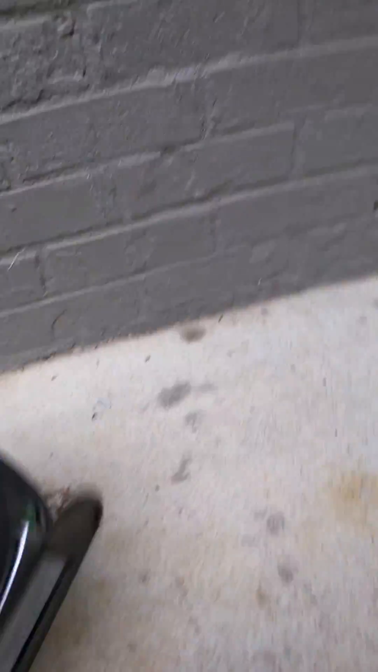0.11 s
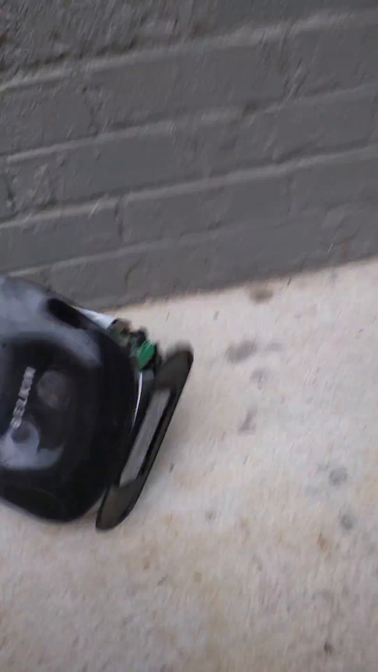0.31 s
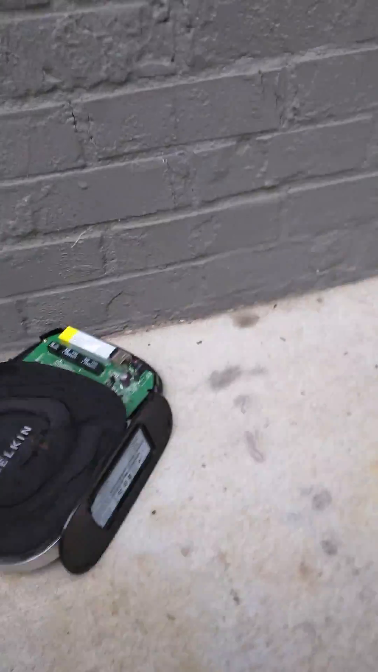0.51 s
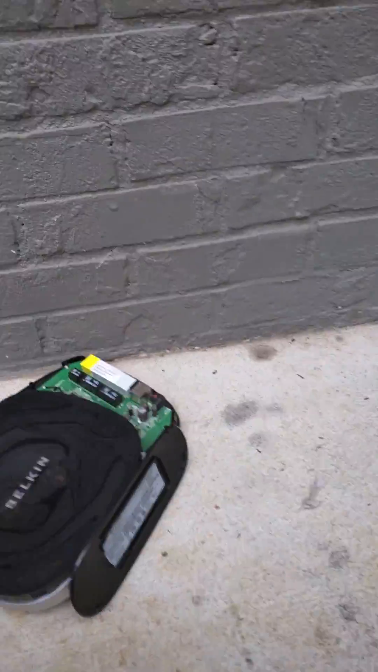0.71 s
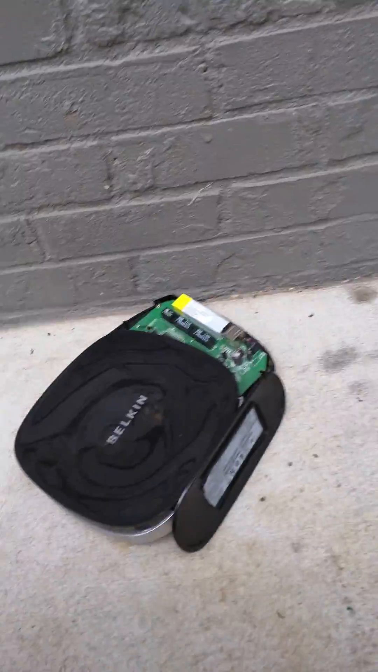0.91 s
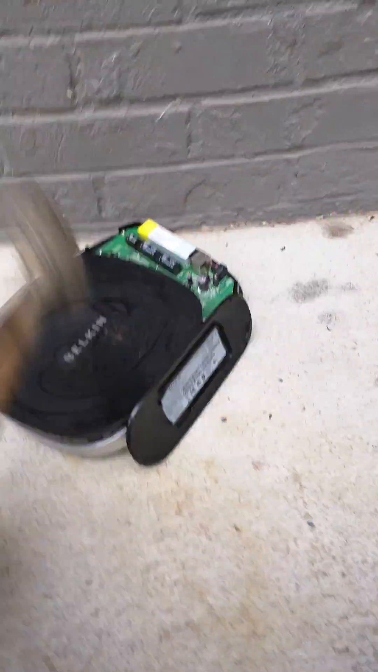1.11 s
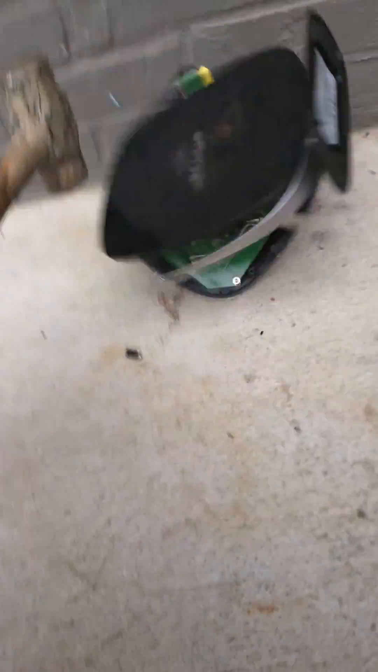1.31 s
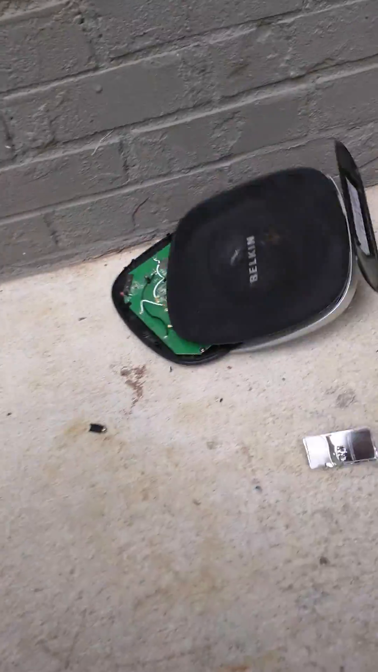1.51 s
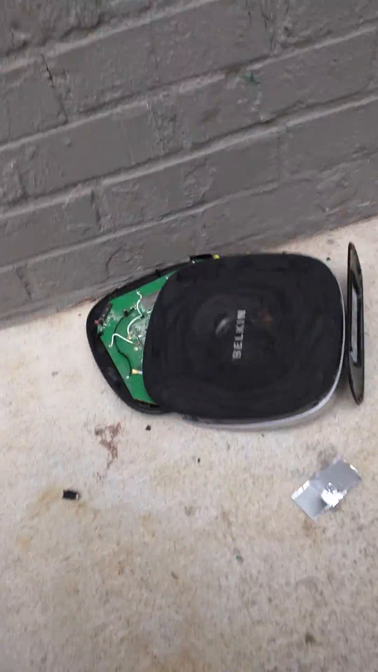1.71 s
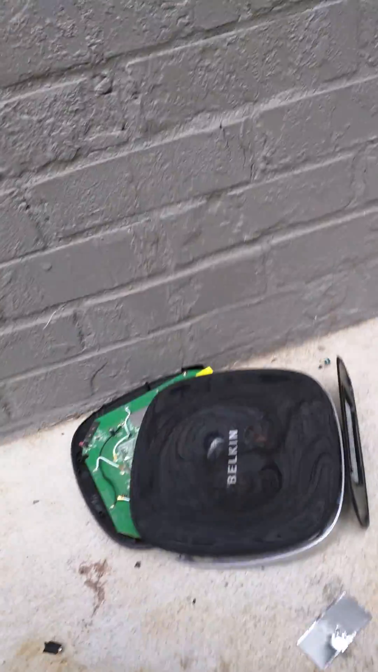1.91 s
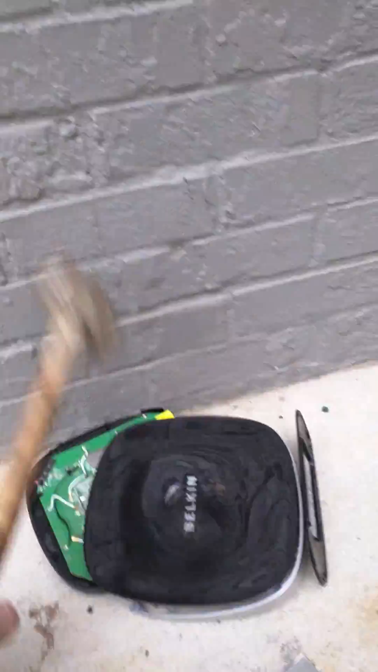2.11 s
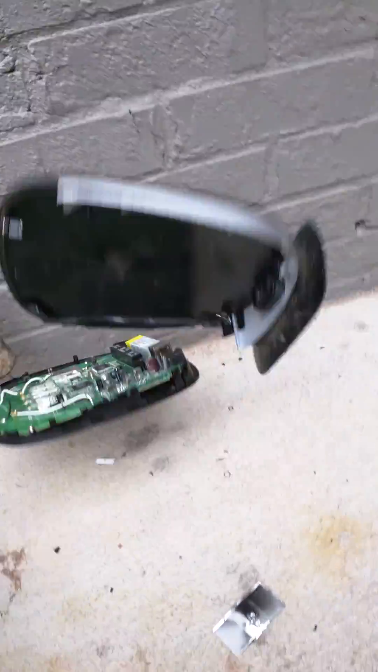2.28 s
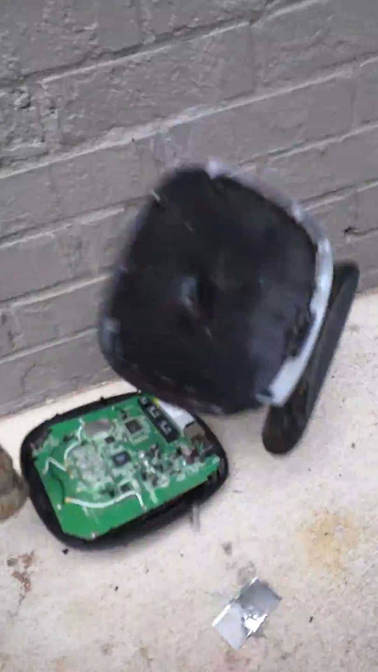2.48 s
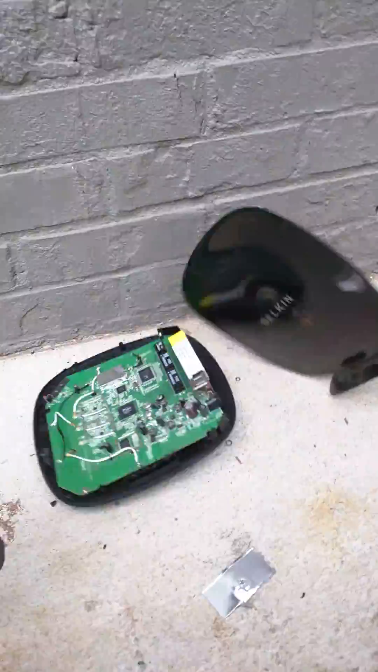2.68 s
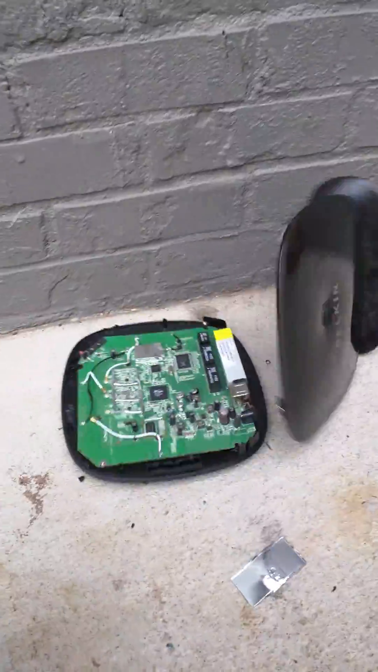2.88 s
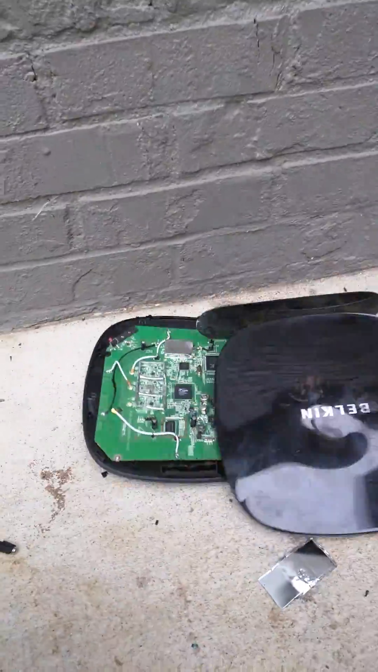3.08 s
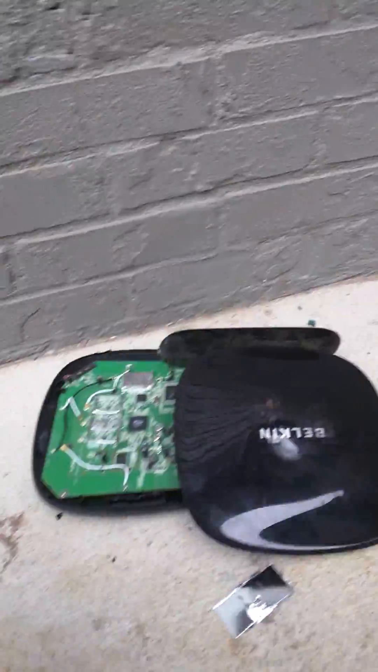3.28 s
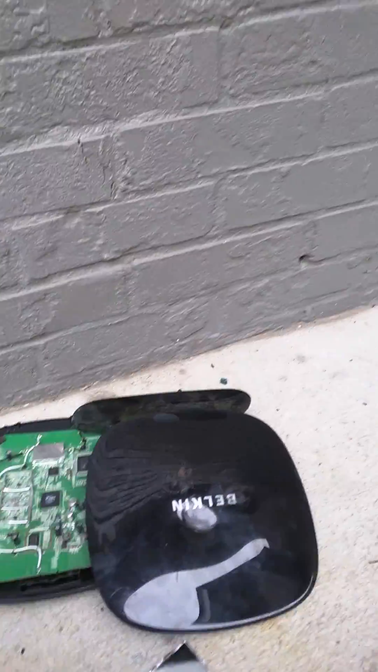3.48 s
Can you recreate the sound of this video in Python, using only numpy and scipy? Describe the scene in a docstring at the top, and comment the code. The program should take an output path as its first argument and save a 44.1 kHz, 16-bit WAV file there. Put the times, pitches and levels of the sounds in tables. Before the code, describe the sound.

Three hard, crunching hits break a hollow plastic case outdoors, with rattling bounces and metal tinkles

```python
"""Three heavy blows smash a plastic electronic device on concrete beside a brick wall: bursts of shaped noise.
After the first two the hollow case tumbles and clatters; the third knocks the lid off, which bounces and settles.
Each knock is noise ringing a resonant shell, plus a pitched panel and a click; chips and metal are fading sines.
Noise tails make the yard answer, rumble and hiss lie underneath, and the close microphone overloads.
"""
import sys
import numpy as np
from scipy import signal
from scipy.fft import rfft, irfft, next_fast_len
from scipy.io import wavfile
from scipy.ndimage import uniform_filter1d

SR = 44100
rng = np.random.default_rng(int(sys.argv[2]) if len(sys.argv) > 2 else 0)


def wav_record(signal):
    """Record a signal, one row per channel, as 16-bit PCM in the file named by sys.argv[1]."""
    frames = np.transpose(np.atleast_2d(signal))
    bounded = np.clip(frames, -1, 1)
    # unit amplitude maps onto the largest positive 16-bit level
    quanta = np.round(bounded * 32767).astype(np.int16)
    wavfile.write(sys.argv[1], SR, quanta)


N = 160965
T = np.arange(SR * 3 // 4) / SR  # time within one event, s

# In every table t60_s is the time to fall by 60 dB.
# Outdoor rumble and hiss, relative colours: pitch_hz, level_db
RUMBLE_COLOUR = [(15, -5), (25, -4.5), (64, -8), (120, -6.5), (170, -27), (284, -15.5), (486, -32),
                 (1300, -20), (3000, -81)]
HISS_COLOUR = [(200, -23), (600, 2.5), (1400, -4), (2700, -0.5), (15800, -1.5)]
RUMBLE_DB = -47.5
# Loudness of the faint hiss over time: time_s, level_db
HISS_LEVEL = [(0, -54), (.2, -43.5), (1.151, -51), (2.101, -57), (2.26, -56.5), (3.65, -51.5)]

# Slow subsonic swings of the recorder's zero line after each blow: peak_s, level_db, rise_s, settle_s
# (settle_s is the time to fall to about a third)
ZERO_LINE_SWINGS = [(.405, -19.5, 0.1, 0.064), (1.485, -18.5, 0.14, 0.05), (2.49, -30, 0.16, 0.038)]

# Low thuds: start_s, level_db, t60_s
THUDS = [(0.122, -38, 1), (0.209, -25, 0.16), (0.4, -28.5, 0.2), (1.29, -19.5, 0.054), (1.439, -40.5, 0.56),
         (2.292, -22.5, 0.1), (2.469, -38, 0.43), (2.72, -39, 0.73), (3.232, -33, 0.71), (3.309, -38, 0.71)]
# Relative colour of the thuds: pitch_hz, level_db
THUD_COLOUR = [(20, 1.5), (70, -4), (140, -10), (260, -18), (800, -60)]

# How fast the yard's answer dies: pitch_hz, t60_s
YARD_FALL = [(200, 0.63), (1400, 0.49), (4000, 0.4), (14000, 0.35)]
YARD_DB, METAL_YARD_DB = -6, -8  # the whole answer; the metal's share of what the walls receive

# Loose fragments rattle: start_s, end_s, level_db
RATTLES = [(0, 0.071, -44.5), (0.418, 0.803, -26), (1.462, 1.818, -29), (2.001, 2.199, -50),
           (2.685, 2.86, -31), (3.159, 3.469, -37.5)]
FRAGMENTS_PER_S = 190

# Touches of a thin metal shield skipping on the concrete, then of the same shield earlier on, while still fixed
# in the case: # start_s, level_db, rise_s, t60_s (varied for each mode), favoured_hz, boost_db
SHIELD_PINGS = [(1.497, -28, .006, 0.28, 4753, 16), (1.68, -29, .006, 0.36, 3924, 40),
                (1.738, -21, .003, 0.14, 9715, 2), (1.785, -27.5, 0.014, .25, 15288, 0),
                (1.8, -30.5, 0.021, 0.33, 4753, 26), (1.857, -26, .004, 0.22, 9715, 15),
                (1.869, -26, 0.0045, .15, 14325, 10), (1.907, -23.5, 0.013, 0.096, 10117, 12),
                (1.922, -27.5, .004, 0.11, 9715, -3), (3.279, -27.5, 0.0045, .17, 15288, 14),
                (3.292, -30, .004, .2, 7478, 8), (3.311, -27.5, .004, 0.2, 9715, -2),
                (3.34, -21.5, 0.0045, 0.16, 8387, 7), (3.358, -40, .008, .25, 7478, 18),
                (3.389, -23, .002, 0.094, 9715, 5), (3.417, -29, 0.0078, 0.17, 5373, 13),
                (3.449, -31, 0.0046, 0.086, 15288, 13), (3.464, -40, .003, 0.1, 9715, 0)]
FIXED_SHIELD_PINGS = [(.432, -28, 0.0035, .25, 5108, 16), (.476, -33, .002, .1, 12510, 8),
                      (.645, -21, .002, 0.14, 14730, 9), (.655, -37, .005, .25, 5108, 14),
                      (.735, -28.5, 0.0074, 0.21, 5108, 22), (.812, -34, .002, .16, 11948, 6),
                      (.836, -40, 0.002, .07, 14730, 16), (.856, -42.5, .003, .4, 5108, 28),
                      (.865, -35.5, .002, .16, 12510, 6), (.877, -38, 0.0015, .1, 14730, 14),
                      (.904, -40.5, .002, 0.12, 12510, 5), (.921, -35, .003, 0.12, 11948, 5),
                      (.94, -39.5, .002, 0.068, 10390, 6)]
# Ringing modes of the loose shield and of the shield still fixed in the case, before small random shifts:
# pitch_hz, relative level_db
SHIELD_MODES = [(3924, -24.5), (4753, -4.5), (5373, -3.5), (7478, 1.5), (8387, 0.5), (9510, 0.5), (9715, 7),
                (10117, 4), (10610, -7), (11400, 0), (12465, 3), (13500, -11), (14325, 2), (15288, 2)]
FIXED_SHIELD_MODES = [(5108, -3), (6600, -10), (9030, 1.5), (9652, 5), (10080, -8.5), (10390, 2), (11948, 0),
                      (12510, 1), (13318, -4), (14730, -4)]
FAVOUR_OCTAVES = 0.063  # how near to the favoured mode others are boosted too
BEND, DAMPING_SPREAD = .002, .25  # random spread of pitch (fraction) and of fall time (log scale)
BUZZ_PER_S, BUZZ_DB_PER_HZ, BUZZ_RAD_PER_HZ = 230, .00045, .00008  # higher modes waver more
SCRAPE_DB, SCRAPE_T60 = -6, 0.12  # gritty rub of the metal on the concrete after each touch; dB, s

# Knocks of the case, then of the loose lid, on the ground; levels are before each group's trim:
# start_s, click_db, bass_db, middle_db, presence_db, treble_db, contact_s, pitch_hz,
# panel_db (the pitched knock, relative to the untrimmed bass or middle level)
CASE_KNOCKS = [(0.001, 11, -35, -32, -29, -33.5, 0.0095, 802, -6),
               (0.063, -29, -32.5, -59, -39, -35.5, 0.0031, 1200, -1),
               (0.116, -28, -31.5, -34.5, -33.5, -42, 0.028, 534, -21),
               (0.248, 7, -55, -16, -13, -14, 0.0044, 1700, -5),
               (0.309, -7, -32, -13, -29, -20, 0.007, 1376, -11),
               (0.409, 5, -12, -12.5, -12, -17, 0.0071, 1168, 1.5),
               (0.423, -18, -24, -14.5, -13, -13, 0.0034, 798, 2),
               (0.472, -8, -27, -30, -31, -14, 0.0045, 1280, 0),
               (0.488, -5, -16.5, -12.5, -10.5, -9.5, 0.0063, 760, -1.5),
               (0.512, -14, -37, -15.5, -25, -23, 0.0048, 1154, -0.5),
               (0.524, -4, -24, -9.5, -16, -15, 0.005, 1150, -2),
               (0.553, -1, -25.5, -20.5, -17, -10, 0.017, 1131, -1),
               (0.573, 9, -31, -13.5, -18.5, -7, 0.0062, 1320, -3),
               (0.583, -4, -24, -21, -16, -26, 0.0062, 1144, -2),
               (0.597, 2, -34, -20, -27, -32, 0.002, 1163, 2),
               (0.63, 3, -47, -10.5, -8, -15, 0.0022, 1343, 3.5),
               (0.643, 6, -25, -22, -17, -16.5, 0.0042, 1400, -12),
               (0.66, 3, -30, -17, -21, -24, 0.004, 1360, -7),
               (0.705, 8, -27, -15.5, -10, -17.5, 0.003, 1260, -6),
               (0.72, 7, -41, -15.5, -13.5, -19, 0.0067, 1420, -10),
               (0.741, 4, -40, -15.5, -10, -19, 0.0034, 1290, -6),
               (0.75, 28, -21.5, -14, -13, -10, 0.0037, 1310, -24),
               (0.766, -6, -25, -22, -12.5, -12, 0.0068, 1070, -10),
               (0.792, -21, -30, -17, -36, -36, 0.0034, 1360, -16),
               (0.81, -16, -41, -31, -51, -30, 0.0088, 1206, -14),
               (0.851, -19, -46, -31, -36, -37, 0.0025, 2024, 7),
               (0.909, -27, -55, -35.5, -28, -38, 0.004, 1637, 2),
               (0.949, -19, -51, -36.5, -28.5, -38, 0.0027, 1510, -3.5),
               (0.988, -35, -53, -40.5, -55, -60, 0.003, 1990, 0),
               (1.034, -18, -64, -40.5, -35, -39.5, 0.0028, 1740, -6),
               (1.151, -33, -56, -48, -56, -63, 0.0029, 1100, -5),
               (1.194, -9, -66, -44, -39, -50, 0.003, 1190, -8),
               (1.324, -10, -55, -16, -13.5, -25, 0.0066, 1880, 0.5),
               (1.42, -9, -21.5, -15.5, -20, -31, 0.0031, 630, 2),
               (1.458, -2, -18.5, -19.5, -16, -14.5, 0.011, 803, 4),
               (1.495, -5, -25.5, -13, -30, -22, 0.0065, 1260, -1),
               (1.517, -0.5, -38, -26, -19.5, -5.5, 0.0032, 1710, 7),
               (1.533, 18.5, -19.5, -9, -9.5, -5.5, 0.0086, 1353, -12),
               (1.56, -11.5, -24.5, -9, -8, -8, 0.0027, 1476, -3),
               (1.584, 12.5, -22.5, -13, -16.5, -20.5, 0.0067, 860, -6.5),
               (1.599, 4, -47, -27, -18, -10, 0.0095, 1447, -2),
               (1.627, 7.5, -40, -17, -18, -19.5, 0.0076, 1443, -3),
               (1.666, -6.5, -27.5, -20.5, -20, -7.5, 0.0032, 1640, 1),
               (1.683, 7, -45, -14, -21.5, -18, 0.0073, 1315, -13),
               (1.717, -7, -45.5, -26, -21.5, -16, 0.0055, 1490, 7),
               (1.739, 12.5, -23, -17.5, -16.5, -12.5, 0.0063, 1540, 0),
               (1.751, -15, -22.5, -14.5, -14.5, -10.5, 0.0042, 1460, -10.5),
               (1.789, -16, -31.5, -20.5, -29, -25.5, 0.004, 1677, -1.5),
               (1.864, 6.5, -52, -22, -19, -15, 0.0046, 1387, 0.5),
               (1.901, -3.5, -37, -25.5, -20.5, -28.5, 0.004, 1386, 6),
               (1.964, -31.5, -53, -33, -48.5, -57, 0.004, 1606, 1),
               (2.164, -24, -47, -35, -51, -53.5, 0.008, 1450, -8)]
LID_KNOCKS = [(2.359, 12, -19.5, -34, -26, -31, 0.0029, 610, -14),
              (2.479, -14, -29, -36, -19.5, -40, 0.005, 331, 8.5),
              (2.488, -8, -28.5, -20, -30, -44, 0.0026, 433, 5),
              (2.511, -19, -19, -19.5, -32, -25, 0.0061, 792, -2.5),
              (2.603, 13, -18, -13, -10.5, -15, 0.0023, 990, -4.5),
              (2.612, 17.5, -21.5, -11, -7.5, -15, 0.0029, 1550, -2.5),
              (2.678, -9, -49, -40, -27, -22, 0.0081, 1630, 2),
              (2.694, 2, -23.5, -14.5, -10.5, -22, 0.0066, 620, 2.5),
              (2.705, -10, -23, -13.5, -14.5, -19.5, 0.019, 339, 1.5),
              (2.755, -7, -14, -11.5, -11.5, -17, 0.0069, 1407, -5.5),
              (2.776, -7, -17.5, -16.5, -11, -18.5, 0.0065, 694, -2),
              (2.823, -10, -28, -27, -26, -29, 0.005, 577, 7),
              (2.864, -16, -29.5, -42, -36, -34, 0.015, 555, 0.5),
              (2.906, -25, -20, -18, -20, -31, 0.0082, 1360, -7),
              (2.937, 2, -26.5, -20, -16.5, -30, 0.0019, 1176, -7),
              (2.975, -21, -55, -49, -45, -38, 0.0053, 1460, -4),
              (3.009, -3, -32, -19, -26, -25.5, 0.0029, 1200, -1.5),
              (3.047, -17, -24.5, -19.5, -17, -27.5, 0.0021, 2210, -1),
              (3.113, -23, -44, -31, -40, -35, 0.0083, 1180, -3),
              (3.159, -16, -22.5, -22.5, -30, -32, 0.0031, 890, -6),
              (3.17, -14, -22.5, -17.5, -20, -21.5, 0.002, 556, 2.5),
              (3.201, 10, -19, -18.5, -17.5, -29.5, 0.0057, 272, 0),
              (3.217, -14, -25, -18.5, -19, -25, 0.0044, 837, -2),
              (3.279, -12, -26.5, -22.5, -31, -26, 0.0069, 311, -1.5),
              (3.342, -18, -55, -40, -54, -36, 0.0052, 860, 6),
              (3.389, -7, -30.5, -21, -22.5, -37, 0.0089, 800, -8.5),
              (3.449, -2, -33, -29, -28.5, -29, 0.0079, 740, -8),
              (3.514, -19, -38, -30, -35, -41, 0.002, 960, -2),
              (3.547, -16, -35, -33, -31, -37.5, 0.0018, 1120, -13),
              (3.58, -35, -62, -34, -35.5, -53, 0.006, 894, -4)]
# Bass, middle, presence and treble bands of a knock: low_hz, high_hz
KNOCK_BANDS = [(180, 700), (700, 2200), (2200, 6500), (6500, 17000)]
# Resonances of the closed case, the case once sprung open, and the lid, before the shifts below:
# pitch_hz, width_hz, relative level_db
CLOSED_CASE = [(616, 40, 0.5), (770, 99, -9), (1176, 18, 0), (1265, 27, 0), (1330, 100, -4), (1405, 52, -1),
               (3470, 210, 1.5), (3830, 130, -2), (5170, 98, -3), (6850, 41, -16.5), (11800, 140, 3.5)]
OPEN_CASE = [(660, 55, 0), (910, 90, -4), (1300, 40, 4), (1280, 54, -5.5), (1397, 120, 7), (1624, 74, 3),
             (1750, 50, -9.5), (1930, 53, -7), (3820, 97, 6.5), (4840, 33, -9.5), (13500, 250, -11.5)]
LID = [(361, 26, -6.5), (567, 30, 2), (724, 59, -5), (856, 160, -3), (1150, 180, -9), (1390, 130, -9),
       (1770, 45, -13), (2060, 73, -5), (3030, 240, -4), (3500, 150, 1), (3950, 210, 0), (4460, 290, -9)]
SPRINGS_OPEN_S = 1.28
FLEX, FLEX_DB = .012, 1.5  # random shift of the shell from knock to knock: fraction of pitch, dB
EDGE_DB, EDGE_WIDTH = 4.5, 0.022  # stiff local modes of the edge that lands: gain, width over frequency
STRIKE_T60 = 0.019  # first touch of each knock, over the chatter that follows, s
PANEL_T60, PANEL_ATTACK_S = 0.035, 0.00067  # the panel that lands rings at its own pitch

# Heavy blows: start_s, level_db, crush_s, t60_s, echo_db
BLOWS = [(.2030, -6.5, 0.021, 0.1, -17), (1.2840, -6, 0.014, 0.13, -17.5),
         (2.2940, -5.5, 0.0068, 0.14, -18)]
# Relative colours of the blow and of its echo: pitch_hz, level_db
BLOW_COLOUR = [(59, -39), (100, -7), (372, -6), (568, -10), (702, -5), (1190, -2), (1640, -7), (1820, 0),
               (2450, -7.5), (3510, -6.5), (4930, -7), (12300, -5), (15800, -5.5)]
ECHO_COLOUR = [(88, -15), (150, -6.5), (713, -11.5), (883, -4.5), (1140, -7.5), (1410, -4.5), (2480, -9),
               (3660, -8.5), (11300, -11.5), (15800, -17.5)]
ECHO_T60, ECHO_HOLD_S, ECHO_END_T60 = 1.13, .19, 0.48  # steady fall; after the hold a second fall joins it

# Edges between the bands of the noise suppressor: edge_hz
QUIET_EDGES = [350, 2500, 6500]
QUIET_DB, QUIET_SLOPE = -47.5, 0.58  # threshold in each band, extra fall per dB below it
TOP_HZ = 15900  # band limit of the recorder


def amp(db):
    """Turn decibels into gain."""
    return 10 ** (np.asarray(db) / 20)


def unit(x):
    """Scale to an average strength (rms) of 1."""
    return x / np.sqrt(np.mean(x ** 2) + 1e-20)


def along(points, hz):
    """Read a curve of (Hz, value) points on a log pitch axis."""
    f, v = np.transpose(points)
    return np.interp(np.log(hz + 1), np.log(f + 1), v)


def filtered(x, response):
    """Change the strength of each frequency in x by a response."""
    m = next_fast_len(len(x) + SR // 4)
    return irfft(rfft(x, m) * response(np.fft.rfftfreq(m, 1 / SR)), m)[:len(x)]


def noise(colour, size):
    """Make coloured noise of rms 1."""
    return unit(filtered(rng.standard_normal(size), lambda hz: amp(along(colour, hz))))


def fall(t60, hold=0):
    """Hold, then die away."""
    return amp(-60 * np.maximum(T - hold, 0) / t60)


def rise_in(seconds):
    """Come in smoothly from silence."""
    return 1 - np.exp(-T / seconds)


def crackle(rate, depth_db):
    """A fast random gain: many tiny contacts within one impact."""
    knots = np.clip(rng.standard_normal(4096), -2, 2)
    return unit(amp(depth_db * np.interp(T * rate, np.arange(len(knots)), knots)))


def wobble(rate):
    """A random curve through a given number of points a second."""
    return np.interp(T * rate, np.arange(rate), rng.standard_normal(rate))


def add(out, s, x):
    """Mix x into out at time s."""
    i = max(round(s * SR), 0)
    out[i:i + len(x)] += x[:max(N - i, 0)]


def background():
    """A low outdoor rumble and a faint hiss, both coloured noise."""
    hiss_db = np.interp(np.arange(N) / SR, *np.transpose(HISS_LEVEL))
    rumble = amp(RUMBLE_DB) * noise(RUMBLE_COLOUR, N)
    hiss = amp(hiss_db) * noise(HISS_COLOUR, N)
    return rumble + hiss


def zero_line_swings():
    """The recorder's zero line drifts up and settles back."""
    t = np.arange(N) / SR
    out = np.zeros(N)
    for peak, db, rise, settle in ZERO_LINE_SWINGS:
        drift_up = np.clip(1 + (t - peak) / rise, 0, 1)
        out += amp(db) * drift_up * np.exp(-np.maximum(t - peak, 0) / settle)
    return out


def yard(x):
    """Scattered answer of the walls: noise tails in which each frequency dies at its own speed."""
    out, step = np.zeros(N), SR // 4
    for i in range(0, N, step):  # a fresh tail for each quarter second of sound
        hz, t, grains = signal.stft(rng.standard_normal(len(T)), SR, nperseg=256)
        shape = amp(-60 * t / along(YARD_FALL, hz)[:, None]) * (1 - np.exp(-t / 0.0041))
        tail = signal.istft(grains * shape, SR, nperseg=256)[1]
        add(out, i / SR, signal.fftconvolve(x[i:i + step], tail / np.linalg.norm(tail)))
    return out


def thuds():
    """Low thumps of the ground and of moving air, as bassy noise that dies away."""
    out = np.zeros(N)
    for s, db, t60 in THUDS:
        add(out, s, amp(db) * noise(THUD_COLOUR, len(T)) * fall(t60, 0.014) * rise_in(0.0012))
    return out


def fragments(centre_hz, spread, cycles):
    """Chips of plastic tick at random, each with its own short ring of six pitches."""
    out, t = np.zeros(N), T[:SR // 40]
    for start, end, db in RATTLES:
        chips = np.zeros(N)
        count = int(FRAGMENTS_PER_S * (end - start)) + 1
        for when, size, *pitches in rng.random((count, 8)):
            octaves = spread * (2 * np.sqrt(pitches) - 1)
            hz = np.minimum(centre_hz * 2 ** octaves, SR / 2)[:, None]
            chip = np.sum(np.sin(2 * np.pi * hz * t) * np.exp(-hz * t / cycles), axis=0)
            add(chips, start + when * (end - start), amp(3.7 * size) * chip)
        # the root keeps short and long rattles equally strong
        out += amp(db) * unit(chips) * np.sqrt(abs(end - start) * SR / N)
    return out


def metal_pings(rows, modes, tick_db):
    """Each touch bends thin metal and favours one mode; modes buzz on the ground and die at their own speeds."""
    out = np.zeros(N)
    for s, db, rise, t60, favoured_hz, boost_db in rows:
        ring = 0
        for hz, mode_db in modes:
            nearness = np.exp(-(np.log2(hz / favoured_hz) / FAVOUR_OCTAVES) ** 2)
            level_db = mode_db + boost_db * nearness + rng.normal(0, 2)
            bent_hz = hz * (1 + rng.normal(0, BEND))
            phase = 2 * np.pi * (bent_hz * T + rng.random())
            phase = phase + BUZZ_RAD_PER_HZ * hz * wobble(BUZZ_PER_S)
            loudness = amp(level_db + BUZZ_DB_PER_HZ * hz * wobble(BUZZ_PER_S))
            mode_t60 = t60 * np.exp(rng.normal(0, DAMPING_SPREAD))
            ring = ring + loudness * np.sin(phase) * fall(mode_t60, rise)
        ring = ring * np.minimum(T / rise, 1)
        ring = ring / np.sqrt(np.mean(ring[:SR // 50] ** 2))  # rms 1 over the first 20 ms
        scrape = amp(SCRAPE_DB) * crackle(rate=500, depth_db=7.5) * fall(SCRAPE_T60)
        grit = noise([(1000, -27), (8000, 11)], len(T))
        tick = (amp(tick_db) * fall(0.04) + scrape) * grit
        add(out, s, amp(db) * (ring + tick))
    return out


def resonance(f, hz, width):
    """Response of one springy mode: strongest at hz, weaker on both sides."""
    return 1j * f * width / (hz * hz - f * f + 1j * f * width)


def knocks(rows, modes, ring_db, t60, click_db, gain_db):
    """Each contact is a click, a pitched knock and brief chatter ringing the shell; the landing edge colours it."""
    out, first, size = np.zeros(N), SR // 50, 8192
    f = np.fft.rfftfreq(size, 1 / SR)
    filters = [signal.butter(3, band, 'bandpass', fs=SR, output='sos') for band in KNOCK_BANDS]
    for s, row_click_db, *levels, contact, pitch, panel_db in rows:
        shell = 1
        for hz, width, db in modes:
            mode_gain = amp(db + ring_db + rng.normal(0, FLEX_DB))
            shell = shell + mode_gain * resonance(f, hz * (1 + rng.normal(0, FLEX)), width)
        edge = sum(resonance(f, hz, EDGE_WIDTH * hz) for hz in rng.uniform(1923, 15330, size=9))
        chatter = crackle(rate=1200, depth_db=4.0) * fall(t60, contact)
        force = (fall(STRIKE_T60) + chatter)[:size]
        for sos, db, trim_db in zip(filters, levels, gain_db):
            # fresh noise in each band, levelled over its first 20 ms
            struck = irfft(rfft(force * rng.standard_normal(size)) * (shell + amp(EDGE_DB) * edge))
            ring = signal.sosfilt(sos, struck)
            add(out, s, amp(db + trim_db) * ring / np.sqrt(np.mean(ring[:first] ** 2)))
        panel = np.sin(2 * np.pi * pitch * T) * fall(PANEL_T60, contact) * rise_in(PANEL_ATTACK_S)
        band_db = levels[int(pitch > KNOCK_BANDS[0][1])]  # bass or middle
        add(out, s, amp(band_db + panel_db) * panel)
        add(out, s, amp(row_click_db + click_db) * fall(0.0048) * rng.standard_normal(len(T)))
    return out


def blows():
    """Each blow crushes the plastic in a burst of noise, and its echo hangs between the walls."""
    out = np.zeros(N)
    for s, db, crush, t60, echo_db in BLOWS:
        crash = noise(BLOW_COLOUR, len(T)) * fall(t60, crush)
        echo_shape = fall(ECHO_T60) * fall(ECHO_END_T60, ECHO_HOLD_S) * rise_in(0.037)
        echo = noise(ECHO_COLOUR, len(T)) * echo_shape
        add(out, s, amp(db) * crash + amp(echo_db) * echo)
    return out


def scene():
    """Blows, clatter and jingling in the yard, over a quiet outdoor background."""
    closed_rows = [row for row in CASE_KNOCKS if row[0] < SPRINGS_OPEN_S]
    open_rows = [row for row in CASE_KNOCKS if row[0] >= SPRINGS_OPEN_S]
    closed = knocks(closed_rows, CLOSED_CASE, ring_db=4, t60=0.077, click_db=-35,
                    gain_db=[-10.5, -10.0, -14, -8.0])
    opened = knocks(open_rows, OPEN_CASE, ring_db=-0.5, t60=0.1, click_db=-26.5,
                    gain_db=[-8.0, -9.0, -12.0, -12.0])
    lid = knocks(LID_KNOCKS, LID, ring_db=4, t60=0.082, click_db=-18,
                 gain_db=[-9.5, -9.5, -12.0, -4.0])
    plastic = closed + opened + lid + fragments(centre_hz=4600, spread=2.1, cycles=17)
    shield = metal_pings(SHIELD_PINGS, SHIELD_MODES, tick_db=-11.5)
    fixed_shield = metal_pings(FIXED_SHIELD_PINGS, FIXED_SHIELD_MODES, tick_db=6)
    metal = shield + fixed_shield
    walls = amp(YARD_DB) * yard(plastic + amp(METAL_YARD_DB) * metal)
    return (background() + zero_line_swings() + walls + thuds() + metal + plastic + blows())[None]


def suppress(x):
    """A noise suppressor turns down each band above the bass when that band falls quiet."""
    above = [filtered(x, lambda hz: hz ** 4 / (hz ** 4 + edge ** 4)) for edge in QUIET_EDGES]
    out = x - above[0]  # the bass passes untouched
    for upper, next_upper in zip(above, above[1:] + [0]):
        band = upper - next_upper
        level_db = 10 * np.log10(np.abs(uniform_filter1d(band ** 2, size=900)) + 1e-12)
        out = out + band * amp(QUIET_SLOPE * np.minimum(level_db - QUIET_DB, 0))
    return out


def record(dry):
    """The recorder rounds off the loudest peaks, hushes the pauses and cuts steeply above its band limit."""
    top, hardness = .85, 5
    squashed = dry[0] / (1 + np.abs(dry[0] / top) ** hardness) ** (1 / hardness)
    return filtered(suppress(squashed), lambda hz: 1 / (1 + (hz / TOP_HZ) ** 160))[None]


dry = scene()
out = record(dry)
wav_record(out)
```